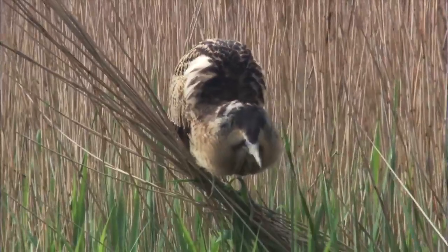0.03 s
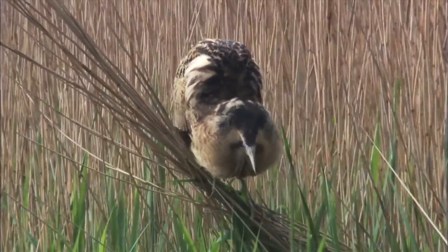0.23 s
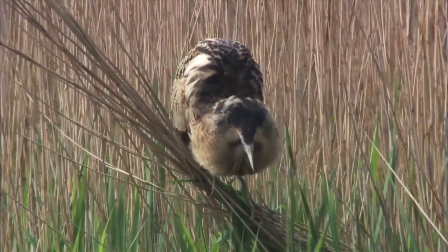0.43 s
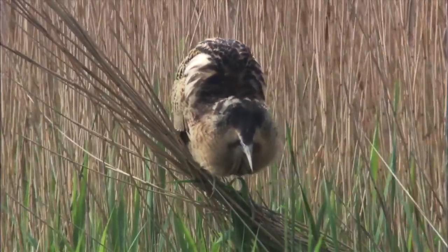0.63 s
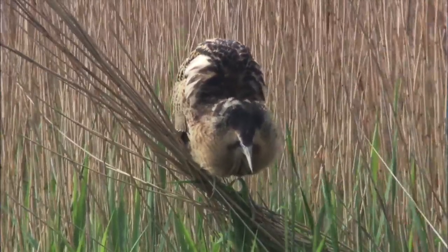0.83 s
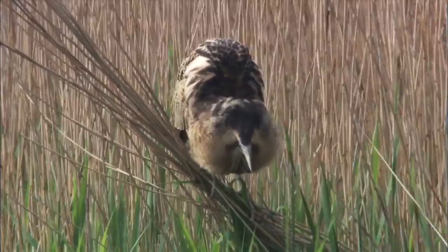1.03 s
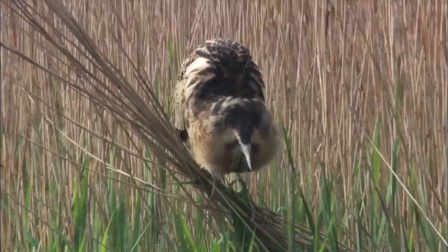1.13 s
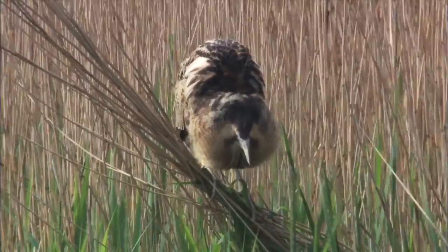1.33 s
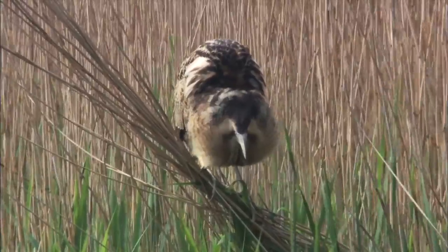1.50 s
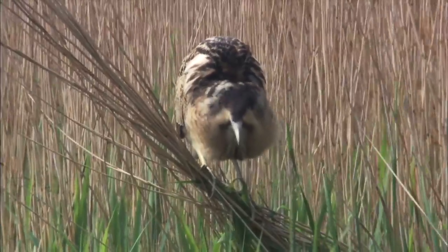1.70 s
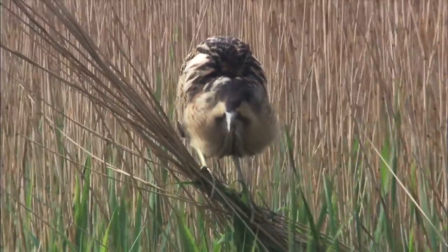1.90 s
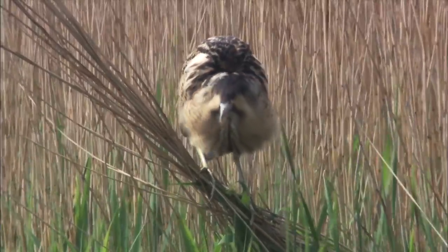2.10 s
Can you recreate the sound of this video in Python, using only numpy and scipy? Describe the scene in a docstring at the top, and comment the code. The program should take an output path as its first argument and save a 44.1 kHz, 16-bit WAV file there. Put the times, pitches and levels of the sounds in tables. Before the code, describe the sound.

In a reedbed, a bittern's soft gulp leads into a single low, hollow boom near the centre. High whistles, chirps and short rasps continue on the right as it dies away, while dry stems tick over faint outdoor rumble.

```python
"""Bittern in a reedbed

Two closely spaced microphones stand in the reeds. A bittern gulps softly, then booms once from its
inflated gullet: a deep, nearly pure tone that rolls away and echoes. On the right a songbird whistles
and a warbler rasps; a waterbird yelps twice and birds chatter far off. Dry stems tick and rustle
over a low outdoor rumble."""
import sys
import numpy as np
from scipy import signal
from scipy.fft import rfft, irfft, next_fast_len
from scipy.io import wavfile
from scipy.ndimage import uniform_filter1d

SR = 44100
rng = np.random.default_rng(int(sys.argv[2]) if len(sys.argv) > 2 else 0)


def master(y):
    """Save y as 16-bit WAV."""
    cut = np.clip(np.atleast_2d(y).T, -1, 1)
    pcm = np.round(cut * 32767)  # scale
    wavfile.write(sys.argv[1], SR, pcm.astype(np.int16))


N = 94815
TIME = np.arange(N) / SR

# Spectra of the open air, the rumble, the far chorus and the rustling reeds.
# Each row: frequency in Hz, relative level in dB.
AIR_COLOUR = [(20, -25.5), (45, -18), (75, -5.5), (115, -1.5), (180, -3), (350, -4), (700, -12),
              (1200, -18), (2500, -19), (5000, -23.5), (7500, -27.5), (10500, -35), (13000, -42.5),
              (15500, -47.5)]
RUMBLE_COLOUR = [(20, -34.5), (55, -21.5), (80, -15.5), (115, 4.5), (160, -2.5), (250, -11.5), (600, -36.5),
                 (2000, -65)]
CHORUS_COLOUR = [(500, -29.5), (1200, -3.5), (1700, -3.5), (2300, -5.5), (3000, -1), (3700, -6.5),
                 (4700, 1.5), (5800, -4.5), (7000, -10.5), (12000, -42)]
RUSTLE_COLOUR = [(2000, -25.5), (6000, -4.5), (8500, 0), (10700, -1.5), (12500, -12), (15500, -18)]
# How rumble, chorus and rustle rise and fall. Each row: time in seconds, level in dB.
RUMBLE_LEVEL = [(0, -49), (.5, -39.5), (.8, -49), (1.2, -47), (1.55, -48), (1.75, -57), (2.15, -54.5)]
CHORUS_LEVEL = [(0, -44.5), (.3, -46.5), (.55, -50.5), (.72, -42), (.9, -47), (1.2, -46), (1.42, -43.5),
                (1.62, -51.5), (1.75, -52.5), (1.79, -42.5), (1.84, -51.5), (2, -60.5), (2.15, -53)]
RUSTLE_LEVEL = [(0, -64), (.3, -64.5), (.5, -71.5), (.68, -64.5), (.95, -65), (1.3, -62), (1.66, -64.5),
                (1.85, -59.5), (2.02, -71.5), (2.15, -64)]
# How alike the two microphones hear the background. Each row: frequency in Hz, correlation.
AIR_LIKENESS = [(30, 0.9), (150, 0.91), (350, 0.77), (700, 0.58), (2000, 0.14), (4000, 0.55), (6000, -.3),
                (10000, 0.088)]
CHORUS_LIKENESS = [(1000, 0.92), (2200, 1), (3600, 0.38), (5000, -0.54), (7000, -0.5)]
# Slurs and very high twitters from far off, and the songbird's quick chirps.
# Each row: start and length in seconds, first and last pitch in Hz, relative level in dB.
FAR_SLURS = [(-.01, .07, 4776, 4770, -51.5), (0.111, 0.0248, 3425, 2210, -44),
             (.618, 0.013, 1537, 1718, -42), (0.749, 0.0228, 1526, 2128, -46),
             (.925, 0.034, 2220, 1730, -48.5), (0.989, 0.049, 1840, 1654, -47.5),
             (1.221, 0.042, 2226, 1514, -44), (1.304, .042, 2028, 1506, -44),
             (1.423, 0.019, 2988, 1910, -47), (1.507, 0.028, 2190, 1586, -45),
             (1.58, 0.0327, 1960, 1540, -56.5)]
FAR_TWITTERS = [(1.335, 0.0433, 9100, 9000, -59.5), (1.44, 0.037, 9000, 9100, -62),
                (1.535, 0.065, 9100, 8900, -61)]
CHIRPS = [(.276, .02, 4700, 4100, -38), (.539, 0.044, 5600, 3900, -33.5), (.638, 0.025, 5900, 3164, -37),
          (.689, 0.0268, 4400, 5240, -38), (.732, .027, 4700, 3844, -39.5), (.955, 0.013, 6700, 4930, -34),
          (1.072, 0.032, 4747, 4005, -41.5), (1.355, 0.022, 5600, 2200, -33.5),
          (1.44, 0.026, 4450, 4000, -45.5), (1.58, .05, 5294, 5847, -49.5), (1.724, 0.047, 3550, 3324, -42)]
# The warbler's rasps. Each row: start and length in seconds, centre in Hz, relative level in dB.
RASPS = [(-.005, 0.014, 2570, -37.5), (0.299, 0.03, 2664, -44), (0.335, 0.028, 2650, -35.5),
         (.622, 0.0352, 2680, -44), (0.662, 0.031, 2610, -36.5), (0.994, 0.046, 2520, -41.5),
         (1.102, 0.016, 2720, -42), (1.257, 0.03, 2670, -42), (1.51, 0.035, 2630, -41),
         (1.772, 0.039, 2750, -40), (2.038, 0.0287, 2550, -45.5), (2.077, 0.024, 2560, -39.5)]
# The bittern's gulp and boom, and the songbird's one long thin whistle.
# Each row: time in seconds, pitch in Hz, relative level in dB.
GULP = [(0, 172.8, -25), (.06, 174.7, -26), (.145, 159.2, -30), (.165, 141, -40), (.185, 135, -29),
        (.205, 131.3, -48)]
BOOM = [(.207, 146, -45), (.222, 143.4, -20.5), (0.24, 133.5, -15), (0.253, 129, -16),
        (0.266, 107.3, -24.5), (0.278, 137.2, -14.5), (.296, 151.5, -13), (.328, 142.5, -10),
        (.39, 140.2, -9.5), (.51, 138.6, -9.5), (.548, 139.8, -14), (.59, 143.3, -19), (.625, 138, -28.5),
        (.66, 138.4, -26), (0.736, 138.4, -41.5), (.85, 141, -48.5)]
THIN_WHISTLE = [(.396, 7080, -50.5), (.408, 6965, -41.5), (.432, 6743, -35), (.47, 6937, -36.5),
                (.51, 6970, -38), (.55, 6840, -40.5), (.59, 7130, -60.5)]
# The bittern's overtones. Each row: harmonic number, level in dB against the fundamental at full effort.
BITTERN_OVERTONES = [(2, -31.5), (3, -44.5)]
# The songbird's short whistles. Each row: start and length in seconds, first, held and last pitch in Hz,
# settling time in seconds, relative level in dB.
WHISTLES = [(0.152, 0.041, 5350, 5700, 7110, 0.0082, -29), (0.192, 0.047, 6800, 5743, 5690, 0.0096, -33),
            (0.231, 0.051, 6600, 4574, 4507, 0.0044, -31), (0.26, 0.078, 2850, 3773, 3590, 0.014, -33),
            (0.599, 0.049, 6900, 5836, 5770, 0.0081, -29.5), (0.955, 0.116, 5190, 4553, 4460, .02, -36),
            (1.321, 0.039, 7000, 5790, 5620, 0.0075, -31)]
# Echoes off the edges of the reed stands. Each row: delay in seconds, level in dB.
SONG_ECHOES = [(.052, -15.5), (.108, -17), (.2, -29)]
# Dry stems ticking. Each row: start in seconds, level in dB.
TICKS = [(0.231, -47), (0.352, -44), (.849, -29.5), (.871, -41), (1.175, -43.5), (1.699, -44)]
# The spectrum of a tick. Each row: frequency in Hz, relative level in dB.
TICK_COLOUR = [(300, -22), (2000, 0), (4000, 0), (8500, -1), (11000, -16), (15000, -27.5)]
# The waterbird's yelps.
# Each row: start and length in seconds, first and last pitch in Hz, relative level in dB.
YELPS = [(0.246, 0.028, 1051, 955, -36.5), (1.679, 0.03604, 1095, 945.8, -35)]
# Their nasal timbre. Each row: harmonic number, relative level in dB.
YELP_PARTIALS = [(1, -2.5), (2, 1), (3, -29.5)]


def amp(db):
    """Decibels to gain."""
    return 10 ** (np.asarray(db) / 20)


def unit(x):
    """Scales to rms 1."""
    return x / np.sqrt(np.mean(x ** 2) + 1e-20)


def read(points, hz):
    """Reads a table over log frequency."""
    f, value = np.transpose(points)
    return np.interp(np.log(hz + 1), np.log(f + 1), value)


def add(mix, start_s, sound):
    """Adds a sound at its start time."""
    at = round(start_s * SR)
    sound = sound[max(-at, 0):]
    part = mix[max(at, 0):][:len(sound)]
    part += sound[:len(part)]


def swell(t, edge_s):
    """A note's soft rise, hold and soft release."""
    return np.sin(np.pi / 2 * np.clip(np.minimum(t, t[-1] - t) / edge_s, 0, 1))


def tone(hz, waver=0):
    """A sine of rms 1 whose pitch wavers by the given fraction."""
    drift = unit(uniform_filter1d(rng.standard_normal(len(hz)), int(.0044 * SR)))
    return np.sqrt(2) * np.sin(2 * np.pi * np.cumsum(hz * (1 + waver * drift)) / SR)


def glides(rows, edge_s, bend, waver):
    """Short notes that slide from one pitch to another."""
    out = np.zeros(N)
    for start, length, first, last, db in rows:
        t = np.arange(0, length, 1 / SR)
        hz = first + (last - first) * (t / length) ** bend
        add(out, start, amp(db) * swell(t, edge_s) * tone(hz, waver))
    return out


def gesture(points):
    """Pitch and gain of a call, silent outside it."""
    s, hz, db = np.transpose(points)
    gain = amp(np.interp(TIME, s, db)) * (TIME >= s[0]) * (TIME <= s[-1])
    return np.interp(TIME, s, hz), abs(uniform_filter1d(gain, size=200))


def tail(x, t60):
    """Scatter from countless stems: sparse random taps that fall 60 dB in t60 seconds."""
    t = np.arange(SR) / SR
    taps = rng.standard_normal(SR) * (rng.random(SR) < .1)
    taps *= amp(-60 * t / t60) * np.minimum(t / .0042, 1)
    return signal.fftconvolve(x, taps / np.linalg.norm(taps))[:N]


def microphones(x, pan_db, lead_s):
    """The close pair: positive pan is louder on the left, positive lead reaches the left first."""
    size = next_fast_len(N + 1000)
    delay = np.exp(-2j * np.pi * np.fft.rfftfreq(size, 1 / SR) * lead_s)
    right = irfft(rfft(x, size) * delay, size)[:N]
    return np.array([x * amp(pan_db / 2), right * amp(-pan_db / 2)])


def reedbed(x, pan_db, lead_s, scatter_db, wet_db):
    """Direct sound, quick scatter and a long tail reach the microphones, partly from all around."""
    ahead, left, right = [amp(scatter_db) * tail(x, t60=.12) + amp(wet_db) * tail(x, t60=.62)
                          for _ in range(3)]
    return microphones(x + ahead, pan_db, lead_s) + .607 * np.array([left, right])


def wash(colour, likeness, patchy_db, pan_db):
    """Diffuse stereo noise whose spectrum drifts in patches by patchy_db."""
    hz = np.fft.rfftfreq(1024, 1 / SR)
    a, b, c, d, patches = rng.standard_normal((N // 256 + 5, 513, 5)).T
    patches = unit(uniform_filter1d(uniform_filter1d(patches, size=5, axis=0), size=22, axis=1))
    shared = read(likeness, hz)[:, None]
    left = a + 1j * b
    right = shared * left + np.sqrt(1 - shared ** 2) * (c + 1j * d)
    spectra = np.array([left, right]) * amp(read(colour, hz)[:, None] + patchy_db * patches)
    noise = signal.istft(spectra, nperseg=1024, noverlap=768)[1][:, :N]
    return unit(noise) * amp([[pan_db / 2], [-pan_db / 2]])


def marsh():
    """All around: steady air, a swelling low rumble, the blurred far chorus and rustling reeds."""
    def gain(levels):
        return amp(np.interp(TIME, *np.transpose(levels)))

    air = amp(-45.5) * wash(AIR_COLOUR, AIR_LIKENESS, patchy_db=0, pan_db=1)
    rumble = gain(RUMBLE_LEVEL) * wash(RUMBLE_COLOUR, AIR_LIKENESS, patchy_db=0, pan_db=-2.5)
    chorus = gain(CHORUS_LEVEL) * wash(CHORUS_COLOUR, CHORUS_LIKENESS, patchy_db=4, pan_db=-2)
    rustle = gain(RUSTLE_LEVEL) * wash(RUSTLE_COLOUR, AIR_LIKENESS, patchy_db=4.5, pan_db=-1.5)
    low_cut = signal.butter(3, 64, "high", fs=SR, output="sos")
    return signal.sosfilt(low_cut, air + rumble) + chorus + rustle


def distant_birds():
    """Far off, near the centre: faint slurred notes, a short trill and very high twitters."""
    trill = [(.089 + k * .017, .011, 1493, 1817.5, -44) for k in range(9)]
    slurs = amp(-1.5) * glides(FAR_SLURS + trill, edge_s=.0065, bend=.744, waver=.022)
    twitters = amp(-5) * glides(FAR_TWITTERS, edge_s=.008, bend=1, waver=.016)
    return reedbed(slurs + twitters, pan_db=-1, lead_s=0, scatter_db=-8, wet_db=-8)


def warbler():
    """On the right: quick pulses and hiss rasp through one falling throat resonance."""
    width_hz, pulse_hz, fall = 530, 95.1, .12
    pole = np.exp(-np.pi * width_hz / SR)
    out = np.zeros(N)
    for start, length, centre, db in RASPS:
        t = np.arange(0, length, 1 / SR)
        pulses = np.diff(np.floor(t * pulse_hz + .5), prepend=0)
        drive = unit(pulses) + 2.2 * rng.standard_normal(len(t))
        hz = centre * (1 + fall * (.5 - t / length))
        carrier = np.exp(2j * np.pi * np.cumsum(hz) / SR)
        # Shift down, low-pass, shift back: a resonance that follows hz.
        rasp = (carrier * signal.lfilter([1], [1, -2 * pole, pole ** 2], drive / carrier)).real
        add(out, start, amp(db - 2.5) * unit(rasp * swell(t, edge_s=.0061)))
    return reedbed(out, pan_db=-6, lead_s=5.5e-5, scatter_db=-3.5, wet_db=-13.5)


def bittern():
    """Near the centre, the inflated gullet rings almost as a sine; the marsh returns it late and faint."""
    shudder_hz, echo_s = 31.5, .595
    shudder = .3 * np.clip((TIME - .5) / .1, 0, 1)  # the throat shudders as the boom runs out
    voice = np.zeros(N)
    for call in (GULP, BOOM):
        hz, gain = gesture(call)
        phase = 2 * np.pi * np.cumsum(hz) / SR
        effort = gain / amp(-8.5)
        sideband = shudder * effort ** .19 * np.sin(phase - 2 * np.pi * shudder_hz * TIME)
        overtones = sum(amp(db) * effort * np.sin(k * phase) for k, db in BITTERN_OVERTONES)
        voice += np.sqrt(2) * gain * (np.sin(phase) + sideband + overtones)
    far = amp(-33) * unit(tail(voice, t60=1.7))
    echo = voice * amp(-34 * abs(TIME - .31))  # mostly the boom's opening comes back
    echo = unit(echo) + amp(-12) * unit(tail(echo, t60=.65))
    add(far, echo_s, amp(-29.5) * unit(echo))
    return microphones(voice + far * voice.std(), pan_db=-1.2, lead_s=6.5e-5)


def songbird():
    """On the right: whistles slide on to a held pitch and echo; quick chirps smear in the reeds."""
    flick_s = .022
    hz, gain = gesture(THIN_WHISTLE)
    song = amp(-.5) * gain * tone(hz, waver=.00875)
    for start, length, first, held, last, settle, db in WHISTLES:
        t = np.arange(0, length, 1 / SR)
        slide = (first - held) * np.exp(-t / settle)
        end_flick = (last - held) * np.clip(1 + (t - length) / flick_s, 0, 1) ** 2
        hz = held + slide + end_flick
        gain = amp(db - 3 - 18 * abs(np.log(hz / held)))  # loudest on the held pitch
        add(song, start, gain * swell(t, edge_s=.0069) * tone(hz, waver=.009))
    echoed = song.copy()
    for delay, db in SONG_ECHOES:
        add(echoed, delay, amp(db) * tail(song, t60=.06))
    chirps = amp(-5) * glides(CHIRPS, edge_s=.0035, bend=.9, waver=.024)
    perch = dict(pan_db=-7, lead_s=8.4e-5)
    return (reedbed(echoed, **perch, scatter_db=-3.5, wet_db=-8)
            + reedbed(chirps, **perch, scatter_db=-1, wet_db=-2))


def reed_ticks():
    """Dry stems give small snaps, each a bright burst of noise."""
    size, rise_s, decay_s = 2000, .00067, .00346
    out, t = np.zeros(N), np.arange(size) / SR
    colour = amp(read(TICK_COLOUR, np.fft.rfftfreq(size, 1 / SR)))
    envelope = np.exp(-t / decay_s) * np.minimum(t / rise_s, 1)
    for start, db in TICKS:
        noise = unit(irfft(rfft(rng.standard_normal(size)) * colour))
        add(out, start, amp(db) * envelope * noise)
    return reedbed(out, pan_db=-1, lead_s=-2.2e-5, scatter_db=-11, wet_db=-23.5)


def waterbird():
    """A little to the left: short nasal yelps that drop in pitch."""
    out = np.zeros(N)
    for start, length, first, last, db in YELPS:
        t = np.arange(0, length, 1 / SR)
        hz = first + (last - first) * (t / length) ** 2
        yelp = unit(sum(amp(level) * tone(k * hz) for k, level in YELP_PARTIALS))
        add(out, start, amp(db - .5) * swell(t, edge_s=.0057) * yelp)
    return reedbed(out, pan_db=2, lead_s=-7e-5, scatter_db=-9.5, wet_db=-17.5)


def scene():
    """Everything that reaches the two microphones."""
    return bittern() + songbird() + warbler() + distant_birds() + waterbird() + reed_ticks() + marsh()


def record(dry):
    """The recorder cuts the treble above 15650 Hz."""
    low_pass = signal.firwin(511, 15650, window=("kaiser", 9), fs=SR)
    return signal.oaconvolve(dry, low_pass[None], "same")


dry = scene()
out = record(dry)
master(out)
```